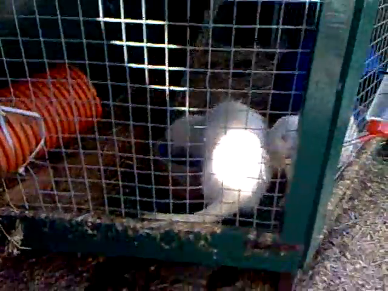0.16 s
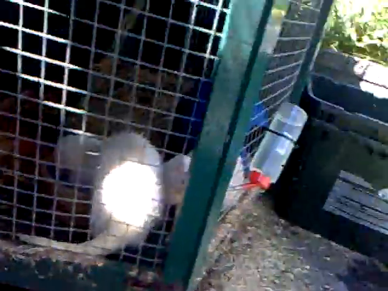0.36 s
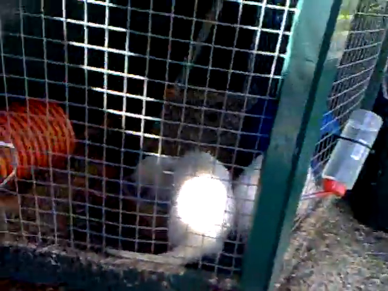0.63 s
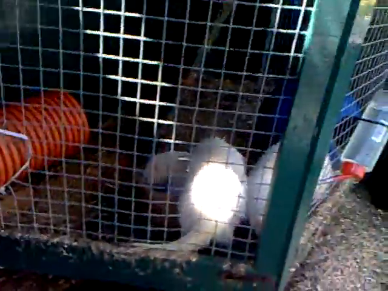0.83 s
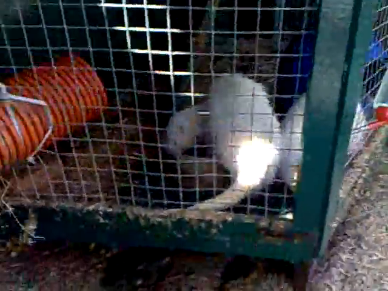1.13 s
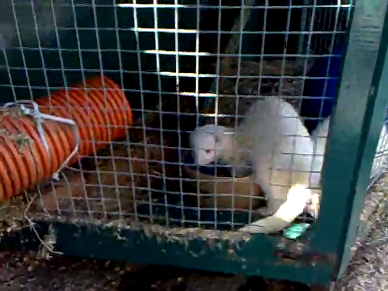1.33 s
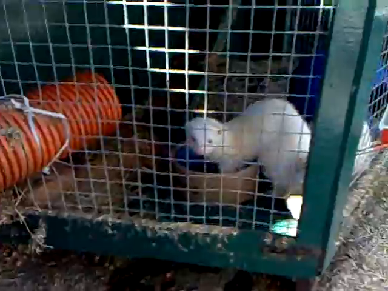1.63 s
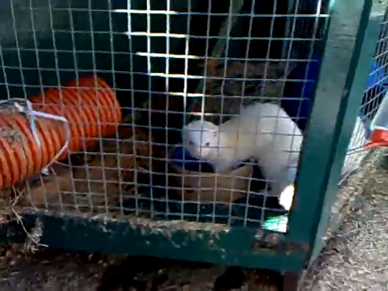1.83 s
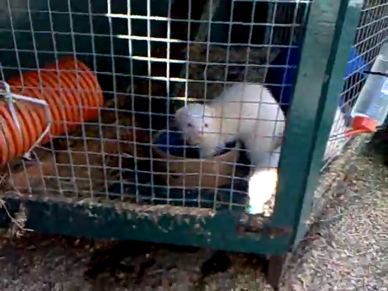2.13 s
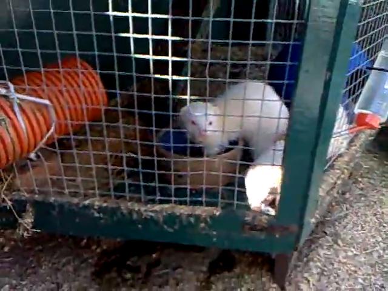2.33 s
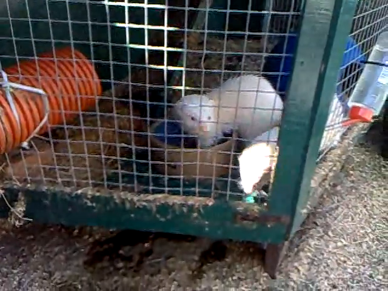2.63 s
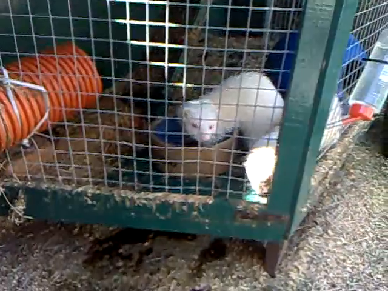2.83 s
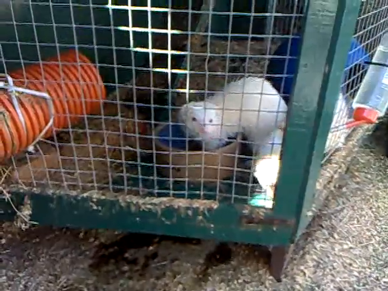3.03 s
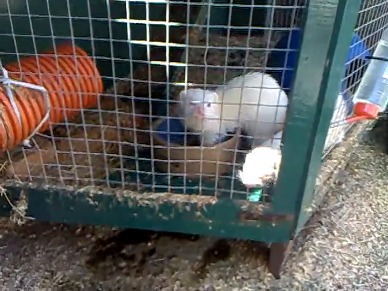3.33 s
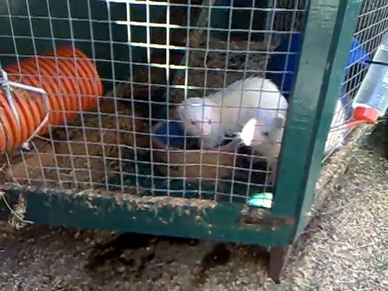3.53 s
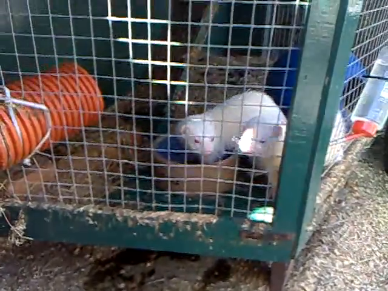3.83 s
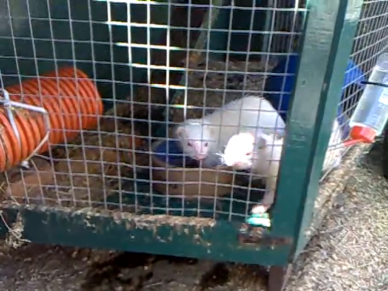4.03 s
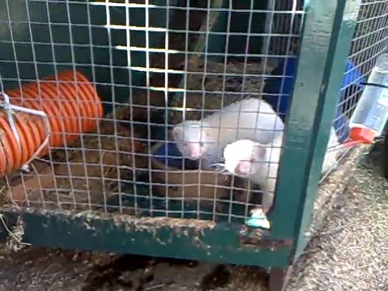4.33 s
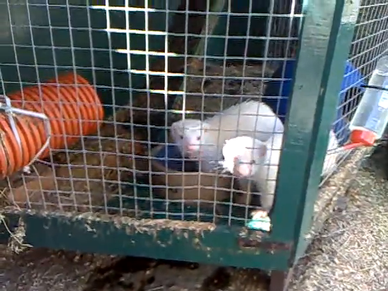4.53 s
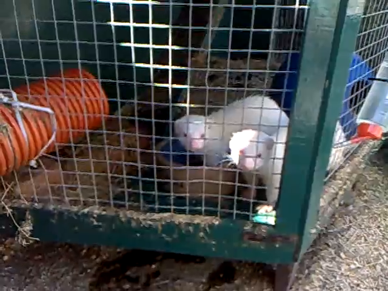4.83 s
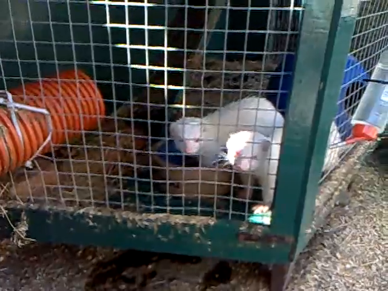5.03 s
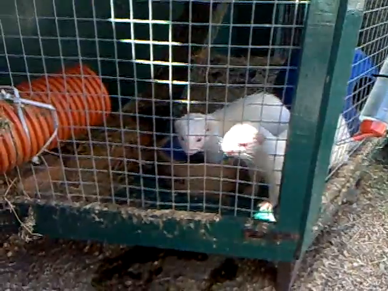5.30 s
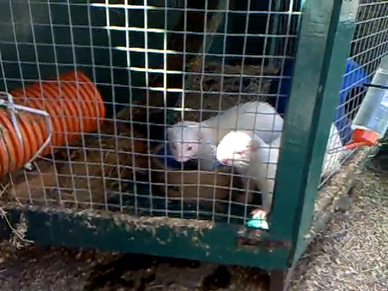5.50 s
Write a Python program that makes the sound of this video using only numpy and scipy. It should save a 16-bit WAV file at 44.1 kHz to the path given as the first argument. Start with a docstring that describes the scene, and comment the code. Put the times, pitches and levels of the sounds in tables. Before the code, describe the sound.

Close up at an outdoor hutch, ferret claws rake wire mesh while paws knock and drag on the wooden frame. Uneven clicks and rattles build to a sharp, bright clatter near three seconds, then nearly stop. Sparse faint taps follow, with another short scrabble just after five seconds. Soft hiss, low rumble and bedding rustle lie beneath; the sound is dry with a very short boxy tail.

```python
"""Ferret scrabbling at a hutch door

A ferret scrabbles, close up, at the door corner of a wire-mesh hutch outdoors.
Paws knock and drag on the wooden frame and claws rake the mesh: each stroke is a burst of slips through fixed modes.
Dry taps and low thumps ring wood and wire at once, and the boarded walls return a short, sparse tail.
Bedding rustles in between, over low rumble and a hiss that rises and falls."""
import sys
import numpy as np
from scipy import signal
from scipy.fft import rfft, irfft
from scipy.io import wavfile
from scipy.ndimage import uniform_filter1d

SR = 44100
rng = np.random.default_rng(int(sys.argv[2]) if len(sys.argv) > 2 else 0)


def wav_record(signal):
    """Record a signal, one row per channel, as 16-bit PCM in the file named by sys.argv[1]."""
    frames = np.transpose(np.atleast_2d(signal))
    bounded = np.clip(frames, -1, 1)
    # unit amplitude maps onto the largest positive 16-bit level
    quanta = np.round(bounded * 32767).astype(np.int16)
    wavfile.write(sys.argv[1], SR, quanta)


N = 249606

# Paw strokes on the wooden frame. Each row: start in seconds, loudest level in dB before the band-pass,
# rise in ms, hold in ms, favoured pitch in Hz, boost of the modes at that pitch in dB.
KNOCKS = [(0.0, -37, 3.5, 2.8, 1340, 9), (.0504, -54.5, 11, 57, 2240, 38),
          (.2549, -43.5, 3.5, 0.3, 3170, 17), (.2829, -55.5, 5, 5.3, 2160, 28),
          (.3193, -53, 10.4, 2.7, 3000, 35), (.3432, -49.5, 15, 13, 2270, 33),
          (.4824, -45.5, 5.5, 5, 2040, 20), (.5083, -29, 4.1, 6, 610, 31), (.525, -29, 2.5, 1.1, 1420, 18),
          (.5448, -36, 5, 52, 2600, 14), (.641, -37, 8.8, 8.6, 2740, 66), (.679, -45, 5, 3, 2520, 29),
          (.7024, -44, 8.6, 3.6, 3070, 38), (.7418, -44, 7, .6, 2750, 72),
          (.895, -30.5, 3.34, 19.3, 910, 12), (.9374, -40.5, 10.4, .6, 2270, 51),
          (.9613, -39, 4.8, .6, 2400, 59), (.9883, -43, 0.88, 7.6, 2670, 28),
          (1.0227, -49.5, 1.3, 38, 3060, 29), (1.1015, -50, 14, .6, 2120, 17),
          (1.1808, -53, 4.7, .6, 3100, 42), (1.4487, -31, 10.3, 20, 2240, -11),
          (1.5525, -45, 0.6, 7, 605, 51), (1.6113, -47, 12, 5, 2750, 31),
          (1.763, -40.5, 3.7, 9.9, 3140, -1), (1.8194, -24.5, 4.37, 3.1, 2480, 30),
          (1.826, -31.5, 4.8, 20, 1340, 18), (1.855, -51, 5, 63, 1000, 13), (2.04, -49, 6.6, 13, 1200, 8),
          (2.1666, -44, 12, 3.3, 2440, 2), (2.208, -43, 3.9, 4, 2020, 6), (2.219, -33.5, 15, 15, 2170, 14),
          (2.2818, -25.5, 18.5, 3.1, 1750, 10), (2.3881, -42.5, 2.03, .6, 980, 20),
          (2.5133, -41.5, 15, 19, 2370, 15), (2.5851, -44.5, 3.2, 13, 338, 28),
          (2.632, -38.5, 4, 29.5, 840, 15), (2.7388, -32.5, 13, 9.2, 1230, 21),
          (2.745, -36.5, 6.8, 17, 2200, 19), (2.755, -38.5, 8, 11, 840, 23.5),
          (2.8281, -21, 8.7, 1.3, 2050, 15.5), (2.834, -27, 6, 4.9, 864, 33),
          (2.832, -30, 8, 12, 400, 28.5), (2.8964, -44, 4.8, 22, 1784, 4), (2.9328, -40, 3.2, 3.4, 2960, 8),
          (2.9772, -34.5, 9.7, 29, 2196, 8.5), (3.0511, -28, 5.28, 34, 909, 19),
          (3.052, -34, 8, 52, 394, 29), (3.056, -22.5, 5.7, 20.7, 2030, 20.5),
          (3.1364, -32, 24, 3, 2100, 9.5), (3.145, -31, 17, 7.9, 805, 15), (3.2262, -41, 7.4, 2.6, 428, 28),
          (3.2805, -55.5, 4.1, 61, 330, 19), (3.6567, -40.5, 8.8, 19, 2100, 1.5),
          (4.479, -59, 3.05, 11, 700, 11), (4.602, -53, 2.2, 6.7, 1720, 15),
          (4.703, -55, 2.3, 7.7, 1400, 19), (5.06, -57, 6.3, 5.5, 2520, 19), (5.085, -58, 6, 6.1, 2400, 10),
          (5.146, -32.5, 5.3, 17, 2670, 31), (5.1618, -22.5, 19.4, 3.2, 1400, 28.5),
          (5.17, -31, 5.3, 5.7, 2320, 25), (5.195, -33, 1.5, 4.4, 1250, 22), (5.22, -49.5, 5, 25, 1300, 9),
          (5.29, -53, 30, 25, 403, 40), (5.625, -46, 31.5, 2.8, 1600, 5)]
# Claw strokes on the wire mesh. Each row: start in seconds, loudest level in dB before the band-pass,
# rise in ms, hold in ms, favoured pitch in Hz, boost of the modes at that pitch in dB.
RAKES = [(0.0244, -41.5, 7.7, .6, 5700, 38), (0.0667, -47.5, 2.6, .6, 5400, 15),
         (0.0857, -46, 5.1, 4, 8700, -2), (0.2578, -48, 0.8, 5, 6000, 21), (.2953, -47.5, 2.5, .6, 7300, 0),
         (0.3564, -50.5, 4.5, .6, 4330, 18), (.3771, -51, 12, 17, 8150, 6),
         (0.4155, -43.5, 2.9, .6, 4070, 25), (0.483, -47, 6.1, 9, 6460, 18),
         (0.509, -33, 2.1, 11, 8360, -2), (0.524, -31, 11.5, 11, 6550, 16),
         (.535, -38.5, 5.6, 70, 3850, 39), (0.563, -42, 2.9, 45, 8300, 5), (0.6475, -42, 16, 3, 6100, 29),
         (.68, -50, 1.1, 8, 6090, 19), (0.7444, -41.5, 3.68, .6, 5200, 17), (0.809, -53, 6.3, 18, 4320, 30),
         (.836, -47, 4.5, 4, 5100, 23), (0.8962, -30.5, 3.7, .6, 6630, 28),
         (.9154, -29, 1.4, 2.5, 4200, 25), (.93, -44, 3.5, 13, 5200, 20), (0.95, -42, 2.1, 6, 5840, 34),
         (0.9814, -45, 4, .6, 6470, 30), (1.0042, -49, 7.7, 8, 6400, 14), (1.0454, -53, 3.8, 3, 4620, 23),
         (1.443, -40.5, 4, 11, 5000, 31), (1.4603, -33.5, 3.3, .6, 6930, 48), (1.483, -40, .6, 9, 6260, 38),
         (1.5507, -47, 2.9, .6, 6800, 16), (1.6224, -34, 2.65, .6, 7000, 17),
         (1.73, -50, 3.9, .6, 6560, 23), (1.764, -43.5, 3.9, .6, 6840, 35), (1.8193, -28, 2.1, 5, 6670, 19),
         (1.83, -45, 5, 50, 4700, 25), (1.9166, -50.5, 25, 45, 7800, 2), (2.008, -44, 1.1, .6, 8800, -9),
         (2.0364, -57, 4.6, 9, 4570, 13), (2.1642, -41.5, 3.03, .6, 5500, -3),
         (2.179, -57, .9, 5, 8880, -11), (2.209, -48, 1.5, 5, 6860, 11), (2.223, -41.5, 14, 17, 4330, 12),
         (2.26, -49.5, 8, 5, 7600, 1), (2.279, -30.5, 6, 9, 4430, 16), (2.304, -34.5, 1.1, 5, 6400, 27),
         (2.3826, -54.5, 4.3, .6, 5800, 36), (2.5034, -46, 9.9, 35, 4760, 12),
         (2.5878, -47.5, 3, .6, 6430, 33), (2.631, -47, 6, 30, 4660, 16), (2.731, -50.5, 6, 6, 4437, 3),
         (2.767, -42, 4.8, 15, 5130, 7.5), (2.8113, -40, 5.1, .6, 8660, 20.5),
         (2.8266, -11.5, 2.6, 13, 7830, 7.5), (2.9013, -24, 4.3, 12, 6030, 25),
         (2.9314, -32.5, 1.6, 2.7, 5060, -12), (2.978, -44.5, 3.1, 32, 7800, 1.5),
         (3.0481, -15, 4.8, 21, 5400, 2), (3.101, -29, 5.3, 4, 8160, 3), (3.1324, -18, 6.7, 27.7, 8280, 3),
         (3.2318, -37.5, 2.2, 2.4, 9050, 6), (3.2845, -55, 1.1, 33, 4750, 9),
         (3.6608, -46.5, 2.8, 11, 4280, 18), (4.2892, -54, 2.4, 3, 4830, 10),
         (4.3307, -50.5, 0.94, .6, 8130, 4), (4.478, -60, 3.7, 14, 4450, 13.5),
         (4.6016, -43.5, 2.2, .6, 6590, 7.5), (4.616, -54, 1.7, 8, 6400, 19),
         (5.077, -52.5, 9, 5, 5000, 11), (5.145, -36.5, 4.8, .6, 5300, 8), (5.1575, -31.5, 14, 7, 4970, 26),
         (5.18, -46, 5.5, 11, 3950, 38), (5.1838, -36.5, 1.1, 19, 4750, 24),
         (5.615, -44.5, 35, 22, 6540, 8)]
# Single dry taps and low thumps. Each row: start in seconds, peak level in dB, favoured pitch in Hz.
TAPS = [(.018, -22, 5330), (0.255, -46, 965), (.296, -33.5, 2500), (.444, -33.5, 4380), (.485, -33, 610),
        (.511, -16, 655), (0.896, -35, 970), (1.221, -65, 506), (1.986, -38, 606), (2.136, -44, 482),
        (2.439, -40, 969), (2.473, -37, 926), (2.501, -45, 2220), (3.608, -52.5, 610), (3.787, -44.5, 2230),
        (4.386, -47.5, 608), (4.479, -41.5, 640), (4.701, -39.5, 600)]
# Modes of the wood, then of the wire, before each spot varies them.
# Each row: frequency in Hz, width in Hz, relative strength in dB.
FRAME_MODES = [(380, 75, -17.5), (434, 60, -14.5), (690, 30, -38.5), (750, 63, -9.5), (878, 23, -10),
               (993, 57, -5), (1195, 140, -0.5), (1416, 190, -3), (1700.6, 17, -1.5), (1892, 72, -5),
               (2086, 100, -4.5), (2288, 81, -2), (2533, 170, -1.5), (2750, 270, -6.5), (3460, 1600, 11),
               (1500, 1500, -59)]
MESH_MODES = [(3940, 200, -20), (4450, 250, -11), (4800, 200, -4), (5050, 220, -5), (5570, 200, -4),
              (6140, 250, -7), (6420, 220, -6), (7080, 250, -8), (7420, 130, -2), (7930, 220, -6),
              (8140, 170, -5), (8370, 150, -3), (8700, 250, -4), (9100, 300, -7), (9900, 500, -10),
              (6800, 3000, -9)]
# Spectra of the hiss and of the rumble. Each row: frequency in Hz, relative density in dB per Hz.
HISS_SPECTRUM = [(100, 3.5), (290, 12.5), (900, 6), (1600, -1), (3800, -2.5), (5300, -2.5), (14400, -6.5),
                 (17500, -8.5)]
RUMBLE_SPECTRUM = [(10, -6.5), (25, -1), (60, 4.5), (100, -1.5), (160, -5), (300, -7.5), (600, -55.5)]
# Level of the hiss, drawn as a wavering curve. Each row: time in seconds, level in dB.
SWELL = [(0.0, -54.5), (.3, -62), (.57, -53), (.82, -59), (1.46, -60), (1.86, -53), (2.24, -61.5),
         (2.65, -56), (3.0, -50), (3.25, -54), (3.341, -61.5), (3.97, -68), (4.22, -66), (4.49, -60),
         (5.08, -63.5), (5.22, -57), (5.66, -66.5)]

FRAME_BAND_HZ, MESH_BAND_HZ = (305, 2950), (4200, 9700)  # what each part radiates well
TICK_BAND_HZ = (10500, 16500)  # where the bare claw tick stands clear of the modes
TOP_EDGE_HZ = 17350
# Fade of the contact force: (T60 in seconds of a quick touch, seconds more per second of hold)
KNOCK_FADE, RAKE_FADE = (0.084, 1.3), (0.056, 0.99)
# Bare tick: dB relative to its rake, dB per dB of pitch boost, ceiling in dB
TICK_UNDER_DB, TICK_PER_FOCUS, TICK_MOST_DB = -15, -.3, -33
TAP_OCTAVES, TAP_T60_S = 0.65, .05  # breadth of the favoured pitch, damping by the paw
HARD_STROKE_DB, USUAL_SWELL_DB = -20, -60  # reference points for the layer levels
# Steady part of a layer: (dB at the usual swell, dB per dB of swell).
# Its stir after a stroke: (dB after a hard stroke, dB per dB of stroke, T60 in seconds).
FRAME_RUSTLE, FRAME_STIR = (-66.5, 1.6), (-38, 1, 0.15)
MESH_RUSTLE, MESH_STIR = (-71.5, 1.8), (-48, 0.6, 0.28)
RUMBLE_REST, RUMBLE_STIR = (-63, 0.96), (-46.5, 0.49, 0.31)
STIR_RISE_S = .02
GUST_DB, GUST_S = -0.95, 0.041  # depth and smoothing time of the lumps in the rumble
ECHO_DB, ECHO_T60_S = -10.0, 0.041


def gain_of(db):
    """Turns decibels into an amplitude factor."""
    return 10 ** (np.asarray(db) / 20)


def evened(x):
    """Scales x to an RMS of one."""
    return x / np.sqrt(np.mean(x ** 2) + 1e-20)


def peaked(x, db, smooth):
    """Scales x so that its loudest moment, as RMS over a few ms, has the given level."""
    return x * gain_of(db) / np.sqrt(uniform_filter1d(x ** 2, smooth).max() + 1e-20)


def banded(x, edges_hz):
    """Keeps only the band between two edges."""
    return signal.sosfilt(signal.butter(4, edges_hz, "bandpass", fs=SR, output="sos"), x)


def coloured(x, points):
    """Filters x by a spectrum drawn on a log-frequency axis."""
    hz, db = np.transpose(points)
    f = np.fft.rfftfreq(len(x), 1 / SR)
    curve_db = np.interp(np.log(f + 1), np.log(hz), db)
    return irfft(rfft(x) * gain_of(curve_db), len(x))


def add(mix, s, sound):
    """Lays a sound into the mix at s seconds, cut off at the end."""
    part = mix[round(max(s, 0) * SR):][:len(sound)]
    part += sound[:len(part)]


def slips(per_s, spread_db):
    """Stick-slip clicks at random moments and of random sign; a few are large."""
    chance, size, sign = rng.random((N, 3)).T
    happens = chance < per_s / SR
    size_db = spread_db * np.minimum(-np.log(size + 1e-9), 4)
    return happens * np.sign(sign - .5) * gain_of(size_db)


def ring(modes, luck, spread_db, near_hz=1, focus_db=0, octaves=1):
    """Impulse answer: the spot touched detunes and weights the modes and favours those near one pitch."""
    hz, width, db = np.transpose(modes)[:, :, None]
    t = np.arange(1200) / SR
    focus = np.exp(-(np.log2(hz / near_hz) / octaves) ** 2)
    db = db + spread_db * luck[:, :1] + focus_db * focus
    hz = hz * (1 + .012 * luck[:, 1:])
    decay = np.exp(-np.pi * width * t)  # a wide mode dies sooner
    return np.sum(gain_of(db) * np.sqrt(width) * decay * np.sin(2 * np.pi * hz * t), 0)


def pressure(rise_ms, hold_ms, t60):
    """Contact force of one stroke: swells, holds, then fades."""
    rise, hold, t60 = max(rise_ms, .3) / 1000, max(hold_ms, 0) / 1000, max(t60, .01)
    t = np.arange(0, rise + hold + t60, 1 / SR)
    rise_db = -12 * np.maximum(1 - t / rise, 0)
    fade_db = -60 * np.maximum(t - rise - hold, 0) / t60
    onset = np.minimum(t * 2000, 1)  # half a millisecond from silence
    return gain_of(rise_db + fade_db) * onset


def strokes(rows, modes, train, fade, spread_db, octaves, impact, smooth):
    """Each stroke gates the slips by its force and rings the modes; also returns the bare slips."""
    rung, bare = np.zeros(N), np.zeros(N)
    luck = rng.standard_normal((len(rows), 2, len(modes), 2))
    spot = rng.random(N) < .5  # every slip falls on one of two spots
    for (s, db, rise_ms, hold_ms, hz, focus_db), chance in zip(rows, luck):
        force = pressure(rise_ms, hold_ms, fade[0] + fade[1] * hold_ms / 1000)
        start = round(max(s, 0) * SR)
        drive = train[start:][:len(force)] * force[:N - start]
        # a quick stroke lands with one clear blow
        drive[force[:len(drive)].argmax()] += impact / (1 + rise_ms / 2)
        here = spot[start:][:len(drive)]
        sound = 0
        for part, c in zip((here, ~here), chance):
            answer = ring(modes, c, spread_db, hz, focus_db, octaves)
            sound = sound + signal.fftconvolve(drive * part, answer)
        add(rung, s, peaked(sound, db, smooth))
        # a slip lasts two samples, which dulls the very top; the bare tick's level is capped
        tick = banded(drive + np.roll(drive, 1), TICK_BAND_HZ)
        tick_db = min(db + TICK_UNDER_DB + TICK_PER_FOCUS * focus_db, TICK_MOST_DB)
        add(bare, s, peaked(tick, tick_db, smooth))
    return rung, bare


def swell_db():
    """Draws the swell as a line through its points."""
    s, db = np.transpose(SWELL)
    return np.interp(np.arange(N) / SR, s, db)


def level(rest, stir, rows):
    """Gain of a layer: a part that follows the swell plus a surge that lingers after every stroke."""
    (rest_db, follow), (stir_db, share, t60) = rest, stir
    t, blows = np.arange(SR) / SR, np.zeros(N)
    s, db = np.transpose(rows)[:2]
    starts = np.round(s.clip(0) * SR).astype(int)
    blows[starts] = gain_of(stir_db + share * (db - HARD_STROKE_DB)) ** 2
    fade = gain_of(-60 * np.maximum(t - STIR_RISE_S, 0) / t60)
    surge = (np.minimum(t / STIR_RISE_S, 1) * fade) ** 2
    steady = gain_of(rest_db + follow * (swell_db() - USUAL_SWELL_DB)) ** 2
    return np.sqrt(steady + abs(signal.oaconvolve(blows, surge)[:N]))  # the two add as power


def frame():
    """Paws on wood: coarse slips ring the low modes."""
    train = evened(slips(1500, 2.8))
    rung, _ = strokes(KNOCKS, FRAME_MODES, train, KNOCK_FADE, spread_db=2.0, octaves=0.31, impact=46, smooth=260)
    return banded(rung, FRAME_BAND_HZ)


def rustle():
    """Bedding and fur brush the hutch: dense small slips through the same modes."""
    out = np.zeros(N)
    wood = level(FRAME_RUSTLE, FRAME_STIR, KNOCKS), FRAME_MODES, FRAME_BAND_HZ, 3200
    wire = level(MESH_RUSTLE, MESH_STIR, RAKES), MESH_MODES, MESH_BAND_HZ, 4000
    for gain, modes, band_hz, per_s in (wood, wire):
        answer = ring(modes, np.zeros((len(modes), 2)), 0)
        clumps = gain_of(1.2 * evened(uniform_filter1d(rng.standard_normal(N), 900)))
        rung = signal.oaconvolve(slips(per_s, 3) * clumps, answer)[:N]
        out += gain * evened(banded(rung, band_hz))
    return out


def hiss():
    """Smooth wide noise, heavier towards the bass, rides the swell."""
    return gain_of(swell_db()) * evened(coloured(rng.standard_normal(N), HISS_SPECTRUM))


def rumble():
    """Lumpy low noise of moving air and of the hutch, shaken by every knock."""
    drift = evened(uniform_filter1d(rng.standard_normal(N), round(GUST_S * SR)))
    low = coloured(rng.standard_normal(N), RUMBLE_SPECTRUM)
    return level(RUMBLE_REST, RUMBLE_STIR, KNOCKS) * evened(gain_of(GUST_DB * drift) * low)


def hutch(x):
    """The boarded walls throw back a short, sparse tail of echoes with random sign."""
    at = np.arange(130, 8000, 22)
    echoes = np.zeros(8100)
    places = at + rng.integers(0, 22, len(at))
    echoes[places] = rng.choice([-1., 1.], len(at)) * gain_of(-60 * at / SR / ECHO_T60_S)
    return signal.oaconvolve(x, echoes / np.linalg.norm(echoes))[:N]


def taps_and_thumps():
    """One blow rings wood and wire together and is damped at once by the paw."""
    out, modes = np.zeros(N), FRAME_MODES + MESH_MODES
    luck = rng.standard_normal((len(TAPS), len(modes), 2))
    for (s, db, hz), chance in zip(TAPS, luck):
        sound = ring(modes, chance, 4.9, hz, 24.0, TAP_OCTAVES)
        sound = sound * gain_of(-60 * np.arange(len(sound)) / SR / TAP_T60_S)
        sound = banded(sound, (280, min(4 * hz, 14000)))  # a softer, low-pitched blow carries less treble
        add(out, s, gain_of(db) * sound / abs(sound).max())
    return out


def mesh():
    """Claws on wire: fine slips ring the high modes, with the ticks themselves at the very top."""
    train = evened(slips(3000, 2.9))
    rung, bare = strokes(RAKES, MESH_MODES, train, RAKE_FADE, spread_db=7.5, octaves=0.28, impact=20, smooth=180)
    return banded(rung, MESH_BAND_HZ) + bare


def scene():
    """Sums the paws and claws, their echo in the hutch, and the beds beneath."""
    paws = frame() + taps_and_thumps() + mesh()
    echo = gain_of(ECHO_DB) * hutch(paws)
    return (paws + echo + rustle() + hiss() + rumble())[None]


def record(dry):
    """Limits the band with a steep low-pass at the top edge."""
    lowpass = signal.firwin(511, TOP_EDGE_HZ, window=("kaiser", 9), fs=SR)
    return signal.oaconvolve(dry, lowpass[None], "same")


dry = scene()
out = record(dry)
wav_record(out)
```